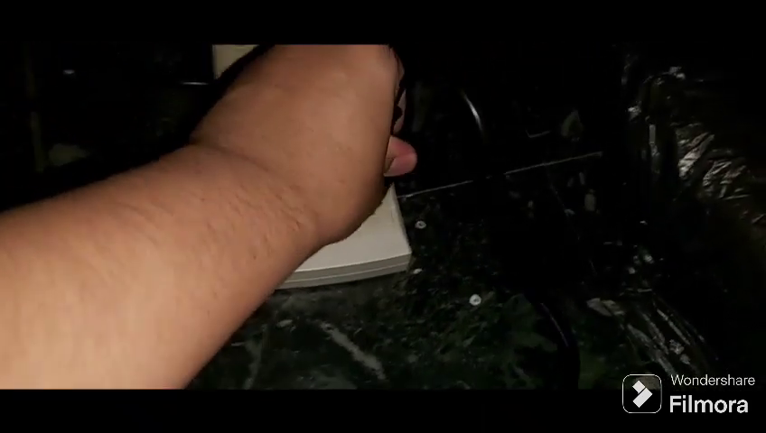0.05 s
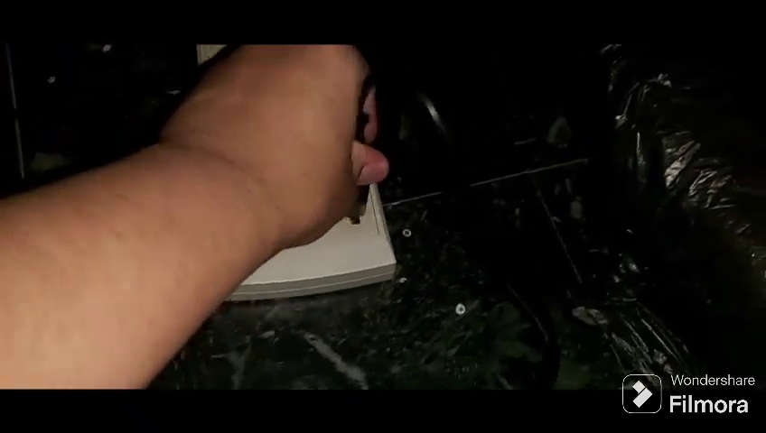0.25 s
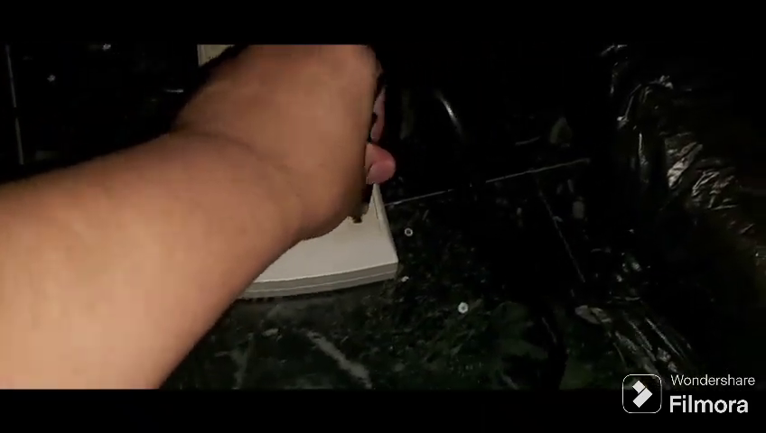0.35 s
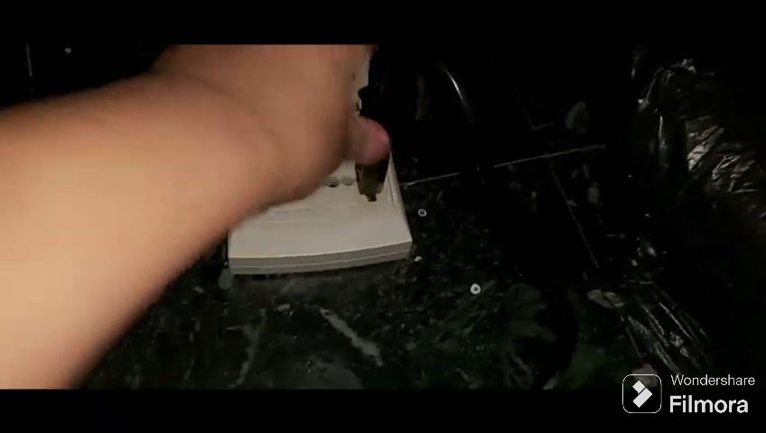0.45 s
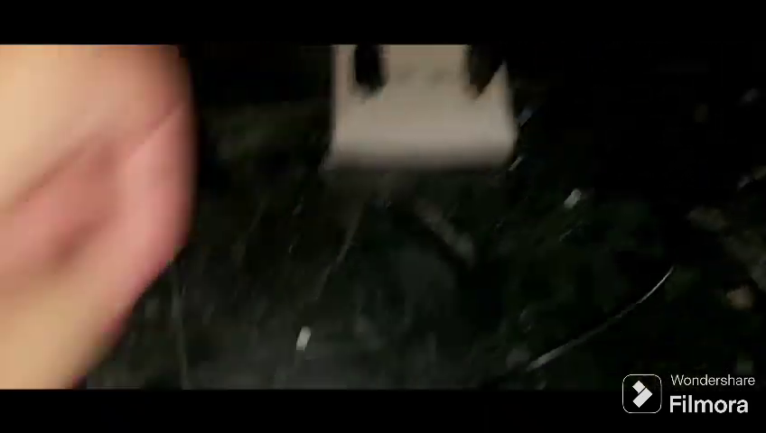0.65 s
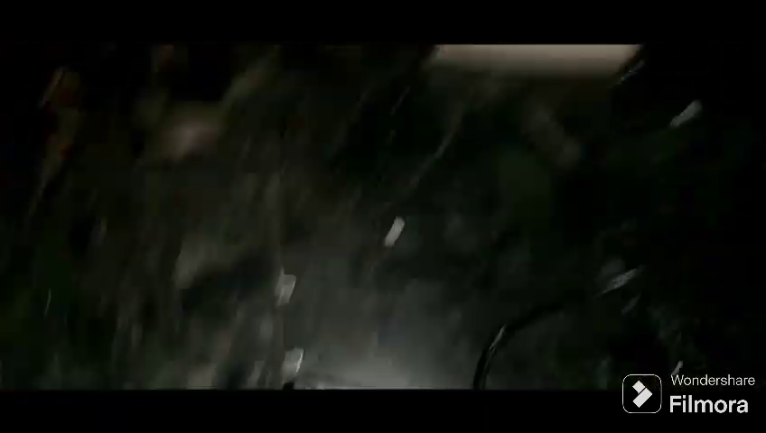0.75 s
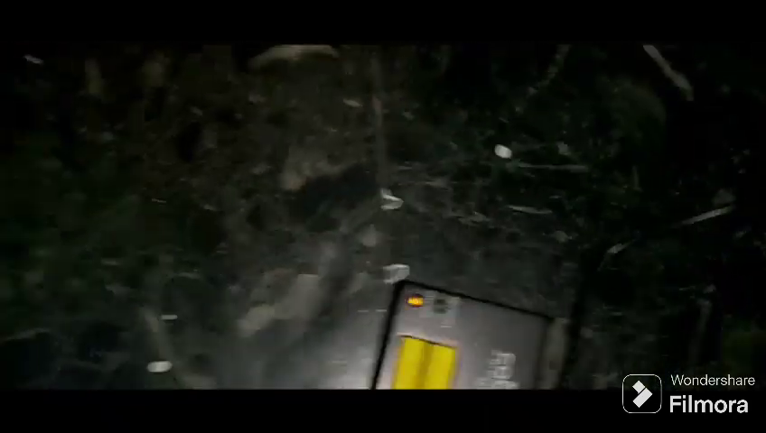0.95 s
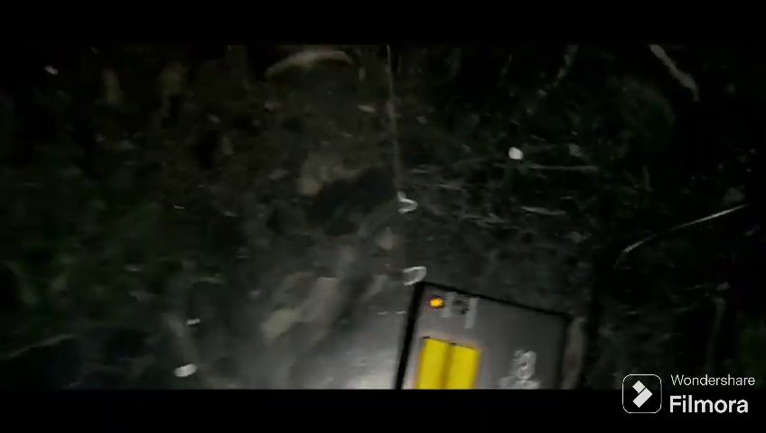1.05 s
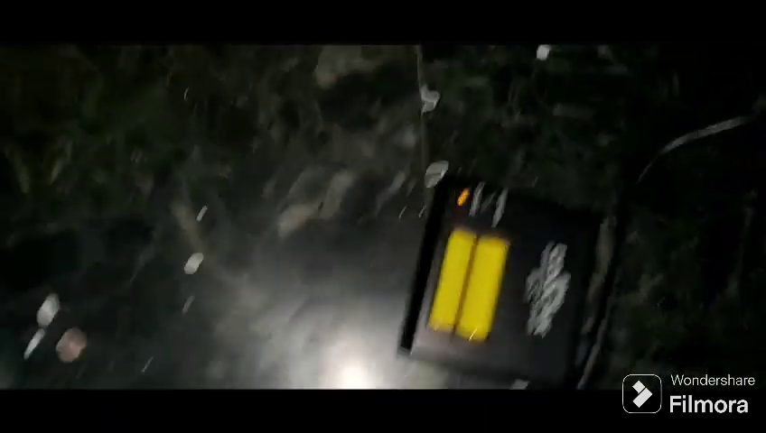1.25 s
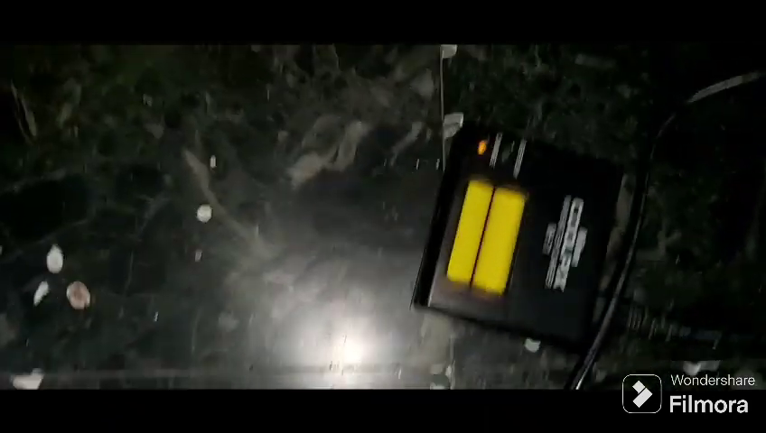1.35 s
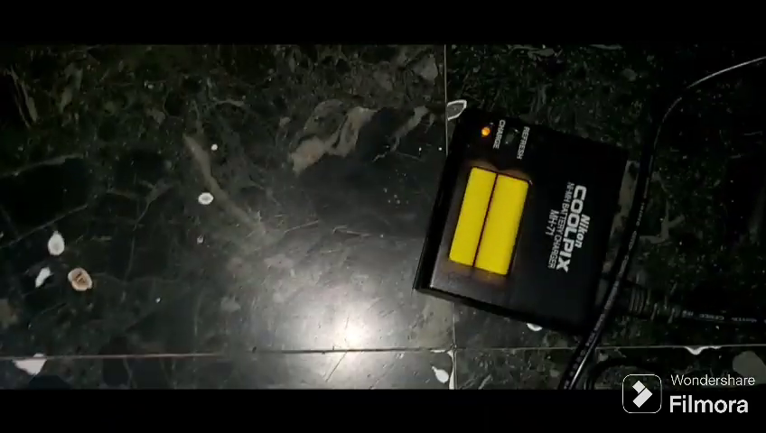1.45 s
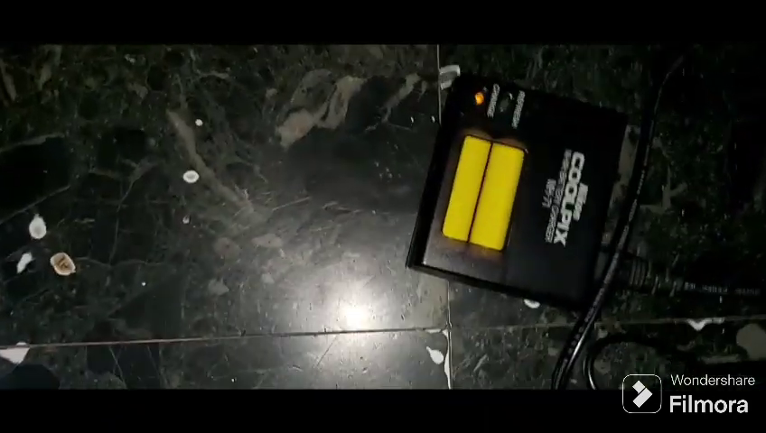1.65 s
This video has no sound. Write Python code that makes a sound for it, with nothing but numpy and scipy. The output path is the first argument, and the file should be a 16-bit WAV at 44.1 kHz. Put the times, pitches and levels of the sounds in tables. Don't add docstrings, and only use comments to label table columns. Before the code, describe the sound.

A plug is pushed into a plastic power strip with a scrape, quick hollow knocks and a sharp snap; then a lone click, faint ticks and a floor scuff, close handheld microphone in a quiet room.

```python
import sys
import numpy as np
from scipy import signal
from scipy.io import wavfile

SR = 44100
rng = np.random.default_rng(int(sys.argv[2]) if len(sys.argv) > 2 else 0)


def master(y):
    cut = np.clip(np.atleast_2d(y).T, -1, 1)
    pcm = np.round(cut * 32767)
    wavfile.write(sys.argv[1], SR, pcm.astype(np.int16))


def ratio_of_db(decibels):
    return 10 ** (np.asarray(decibels, float) / 20)


N = 74970
LAG_STRIP, LAG_HAND = 4, 2

# f/Hz, level/dB
CLOTH_SPECTRUM = [(880, -46.5), (1500, -16), (1850, -10), (3060, -15.5), (4330, -5.5), (8320, 0),
                  (16000, -7.5)]


def at_hz(points, hz):
    point_hz, point_db = np.transpose(points)
    return np.interp(np.log(hz), np.log(point_hz), point_db)


def level(rows):
    s, db = np.transpose(rows)
    return ratio_of_db(np.interp(np.arange(N) / SR, s, db))


def pan(db):
    return ratio_of_db(np.array([[db / 2], [-db / 2]]))


def later(x, count):
    return np.stack([x[0], np.roll(x[1], count)])


def highpass(x, hz):
    return signal.sosfilt(signal.butter(6, hz, "high", fs=SR, output="sos"), x)


def drift(rate_hz):
    slow = np.interp(np.arange(N) * rate_hz / SR, np.arange(400), rng.standard_normal(400))
    return slow / slow.std()


def ring(x, hz, t60):
    radius = ratio_of_db(-60 / (t60 * SR))
    w = 2 * np.pi * hz / SR
    return signal.lfilter([0, np.sin(w)], [1, -2 * radius * np.cos(w), radius * radius], x + 1e-18)


def dying(s, db, t60, attack_s=0.00036):
    t = np.maximum(np.arange(N) / SR - s, 0)
    return ratio_of_db(db - 60 * t / t60) * (1 - np.exp(-t / attack_s))


def noise(spectrum, alike, patchy_db, grain_db=0.):
    out = 0
    edges_hz = 25 * 2 ** np.arange(0, 9.6, .5)
    grain = np.minimum(rng.exponential(1, N), 5)
    white = rng.standard_normal((2, 2, N)) * ratio_of_db(grain_db * grain)
    for k, (low, high) in enumerate(zip(edges_hz, edges_hz[1:])):
        band = signal.butter(2, [low, high], "band", fs=SR, output="sos")
        mid, side = signal.sosfilt(band, white[k % 2])
        gain = ratio_of_db(at_hz(spectrum, np.sqrt(low * high)) + patchy_db * drift(25))
        out = out + gain * (np.sqrt(1 + alike) * mid + np.sqrt(1 - alike) * side * [[1], [-1]])
    return out / np.sqrt(np.mean(out ** 2))


def contact(s, db, length_s, jitter):
    out = np.zeros(N)
    for share, loss_db, j in zip((0, .5, 1), (-10, -1.5, -11), jitter):
        out[int((s + share * length_s) * SR)] += ratio_of_db(db + loss_db + 2.5 * j)
    return out


def strip():
    # t/s, peak level/dB, brightness/dB, contact length/s
    knocks = [(0.032, -55, -6.5, 0.0019), (0.044, -56.5, -12, 0.0015), (0.061, -53, -4, 0.0022),
              (.078, -45, -13, 0.0018), (.083, -44.5, -16, 0.0025), (0.097, -37, -10, 0.0025),
              (0.135, -32.5, -13, 0.0049), (0.17, -32, -7.5, 0.0022), (.213, -47, -9, 0.0022),
              (0.2269, -11, 0.5, 0.0023), (.260, -48, 8, 0.0041), (0.289, -58, -7, .004),
              (0.3677, -38.5, -20.5, .0022), (0.541, -50.5, -15.5, 0.0043), (0.564, -53, -12, 0.0027)]
    # f/Hz, level/dB, t60/s, left-right/dB
    modes = [(618, -14, .03, -9.5), (720.7, -17, 0.032, -2), (860, -12, 0.031, 5), (885, -6.5, 0.034, 4),
             (971, -29, 0.16, 3.5), (1126, -8.5, 0.018, 0), (1275, -18.5, 0.019, 7.5),
             (1750, -36.5, 0.023, -3.5), (2083, -21.5, 0.024, -5.5), (2716, -20.5, 0.028, -6.5),
             (3380, -17.5, 0.024, 8), (3910, -19, .022, 19), (4390, -25, 0.016, -0.5)]
    # t/s, level/dB
    drag = [
        (0, -46.5),
        (.03, -61),
        (.1, -45),
        (.2, -42),
        (.3, -59),
        (.4, -60),
        (.47, -87),
    ]
    slips_per_s, drag_db, drag_dull_db = 700, -14, -7
    grit_db, grit_lengths = -6, 1.8
    bright_hz, soft_hz, cut_hz = 1400, 1350, 600
    out = 0
    jitter = rng.standard_normal((len(knocks), len(modes), 3))
    slip_now = rng.random(N) < slips_per_s / SR
    slips = slip_now * rng.standard_normal(N) * level(drag) * ratio_of_db(drag_db)
    grit = sum(dying(s, db + bright_db + grit_db, grit_lengths * length_s)
               for s, db, bright_db, length_s in knocks)
    soft = signal.butter(2, soft_hz, fs=SR, output="sos")
    for k, (hz, db, t60, pan_db) in enumerate(modes):
        if hz > bright_hz:
            hits = grit * rng.standard_normal(N) + slips * ratio_of_db(drag_dull_db)
        else:
            blows = sum(contact(s, knock_db, length_s, j[k])
                        for (s, knock_db, _, length_s), j in zip(knocks, jitter))
            hits = signal.sosfilt(soft, slips * ratio_of_db(-.5 * db) + blows)
        out = out + pan(pan_db) * ratio_of_db(db) * ring(hits, hz, t60)
    return later(highpass(out, cut_hz), count=LAG_STRIP)


def bright_snaps():
    # t/s, peak level/dB, t60/s, left-right/dB
    snaps = [(0.077, -54, .03, 0.5), (0.0962, -23, .012, -7.5), (.099, -35.5, 0.045, 7.5),
             (0.113, -51.5, 0.17, -1), (0.1716, -39, 0.033, -3.5), (0.180, -52, .2, 0),
             (0.189, -53, .03, -0.5), (.211, -50, 0.03, 0), (.2272, -31, .035, -5.5),
             (.240, -54.5, .15, 0.5), (1.6357, -42, .03, 3), (1.6412, -36, .015, 2),
             (1.570, -61, .05, -1.5), (1.6618, -36.5, .01, -2)]
    # f/Hz, level/dB
    brass = [(1500, -40), (3400, -32), (4300, -4), (6000, -8.5), (7600, -5), (10000, -15), (13500, -0.5),
             (16000, -17)]
    bursts = sum(pan(pan_db) * dying(s, db - 4.5, t60, 0.00031) for s, db, t60, pan_db in snaps)
    return noise(brass, alike=.3, patchy_db=1.0, grain_db=2.0) * bursts


def clear_notes():
    # t/s, peak level/dB, f/Hz, t60/s, left-right/dB
    tones = [(.033, -64, 920, 0.02, 5), (.079, -51, 1026, 0.048, -2), (.096, -45.5, 1804, 0.046, -5),
             (.096, -45.5, 2070, .03, 3), (.137, -42.5, 1650, .045, 6), (.137, -45.5, 2090, .045, 5),
             (.137, -55, 2570, .03, 5), (.170, -52, 784.5, .04, -4), (.173, -48.5, 1707, .07, -1),
             (.188, -43.5, 914, 0.056, 0), (.227, -35, 1855, 0.026, -5), (.2272, -20.5, 3380, .02, -3),
             (.231, -33, 3780, .025, -3), (.229, -34, 4200, 0.028, 3), (.228, -43, 5230, .02, 4),
             (.229, -34.5, 2390, .04, -4), (.367, -50, 658, 0.09, -0.5), (.369, -49, 1090, 0.051, 0.5),
             (.371, -63, 1440, .08, 0), (.541, -59, 648, .1, 2), (.569, -60, 750, .05, 0),
             (.8116, -27, 2170, .022, -2), (.8116, -30, 2830, .02, -3), (.812, -42, 3310, .015, -2),
             (.814, -42, 1670, .025, 0), (.820, -49, 980, .03, 0)]
    out, t = 0, np.arange(N) / SR
    for s, db, hz, t60, pan_db in tones:
        out = out + pan(pan_db) * dying(s, db, t60, attack_s=.0015) * np.sin(2 * np.pi * hz * (t - s))
    return later(out, count=LAG_STRIP)


def squeals():
    # start t/s, length/s, level/dB, first f/Hz, last f/Hz
    glides = [
        (.100, .036, -50, 725, 715),
        (0.256, .02, -50, 880, 933),
        (0.281, 0.033, -50, 929, 968),
    ]
    out, t = 0, np.arange(N) / SR
    for s, length_s, db, first_hz, last_hz in glides:
        u = np.clip((t - s) / length_s, 0, 1)
        swell = np.sqrt(np.abs(np.sin(np.pi * u))) * (u < 1)
        cycles = length_s * u * (first_hz + (last_hz - first_hz) * u / 2)
        out = out + pan(3.0) * ratio_of_db(db) * swell * np.sin(2 * np.pi * cycles)
    return later(out, count=LAG_STRIP)


def tails():
    # t/s, level/dB, t60/s, attack/s
    scrapes = [
        (.09, -54.5, 0.59, 0.0085),
        (0.139, -40, 0.049, 0.0017),
        (.228, -41, 0.17, .003),
        (.255, -79, 0.1, .005),
        (.367, -66, 0.096, 0.0019),
        (0.535, -65, 0.21, 0.0078),
        (0.698, -65, 2.0, .06),
        (1.345, -67, 0.37, 0.021),
        (0, -58.5, 0.093, 0.0012),
        (0.809, -53.5, 0.22, 0.0029),
    ]
    # f/Hz, level/dB
    plastic = [(500, -3), (1200, -6.5), (2500, -8.5), (5000, -18.5), (9000, -29), (16000, -31.5)]
    return noise(plastic, alike=.3, patchy_db=5.0, grain_db=1.5) * sum(dying(*row) for row in scrapes)


def click():
    # f/Hz, level/dB, t60/s
    joint = [(980, -26, 0.028), (1600, -20, 0.03), (2120, -20, 0.017), (2420, -12, 0.015),
             (2770, -4.5, 0.016), (4890, -5, 0.0043)]
    click_s, length_s, pan_db = .8115, 0.0039, 0
    rattle = dying(click_s, -29.5 - 12.5, 3.64 * length_s, attack_s=0.00083)
    grit = rng.standard_normal((len(joint), N)) * rattle
    body = sum(ratio_of_db(db) * ring(g, hz, t60) for (hz, db, t60), g in zip(joint, grit))
    hiss = noise(CLOTH_SPECTRUM, alike=0.716, patchy_db=0.5) * dying(click_s, -37, .03, attack_s=0.002327)
    return later(pan(pan_db) * (highpass(body, 760) + hiss), count=LAG_HAND)


def ticks():
    # t/s, peak level/dB, f/Hz, left-right/dB
    taps = [(.047, -48.5, 5500, 0), (0.0973, -38, 7600, -7), (0.563, -62, 7270, 8),
            (0.7524, -48, 4330, 7.5), (0.7529, -56.5, 5900, 23), (.942, -57, 1107, 3.5),
            (.942, -60, 1898, 5), (1.194, -58.5, 1700, -2.5), (1.195, -57.5, 4386, -3),
            (1.325, -68, 799, -4), (1.590, -62, 8500, 0), (1.325, -64, 4500, -8), (1.269, -57, 13000, -11),
            (.942, -51, 6310, 7.5), (1.020, -55, 7300, -2.5), (1.062, -64.5, 1808, 5.5),
            (1.109, -63, 1503, -6), (1.193, -58.5, 3400, -3), (1.193, -53, 6600, -11),
            (1.269, -53, 7000, -11), (1.269, -56, 8200, -10.5), (1.323, -58, 8070, -20),
            (1.641, -44, 3800, -3), (1.636, -46, 5500, 0), (1.675, -47, 2600, 4), (1.691, -47, 2650, 4),
            (1.6404, -42.5, 2704, 12.5), (1.6616, -37.5, 3530, 2), (1.662, -48, 1255, 10.5)]
    t60_cycles, t = 12.0, np.arange(N) / SR
    out, grit = 0, rng.standard_normal((2, N))
    grit = 0.74 * grit[0] + 0.3 * grit
    for s, db, hz, pan_db in taps:
        tap = grit * dying(s, db - 10.5, .004, 0.00033)
        tone = dying(s, db + 2.0, 2.23 * t60_cycles / hz) * np.sin(2 * np.pi * hz * t)
        out = out + pan(pan_db) * (0.47 * ring(tap, hz, t60_cycles / hz) + 0.5 * tap + tone)
    return later(out, count=LAG_HAND)


def bumps():
    # t/s, peak level/dB, f/Hz
    thuds = [(.14, -55, 70.76), (.245, -49, 110), (0.48, -63, 132.2), (.8155, -45, 278),
             (.9425, -48.5, 360), (1.110, -56.5, 223), (1.5, -59.5, 89), (1.2, -58, 102),
             (0.18, -55.5, 180), (.105, -54, 200)]
    t60_cycles, out = 3.5, 0
    for s, db, hz in thuds:
        push = contact(s, db - 2.5, 0.19 / hz, (0, 0, 0))
        flesh = ring(push, hz, 1 / hz) * 30.0 * hz / SR
        out = out + ring(flesh, hz, t60_cycles / hz) * pan(-2.495)
    return later(out, count=LAG_HAND)


def cloth():
    # t/s, level/dB
    rustle = [(0, -67.5), (.06, -83), (.3, -74.5), (.45, -89), (.65, -90), (.78, -74.5), (.85, -69.5),
              (1.02, -73), (1.08, -79.5), (1.2, -76), (1.3, -83), (1.35, -72), (1.385, -59.5), (1.42, -68),
              (1.46, -83), (1.57, -80), (1.62, -62), (1.7, -72.5)]
    return level(rustle) * pan(-2.2) * noise(CLOTH_SPECTRUM, alike=.3, patchy_db=1.3)


def foot():
    # t/s, level/dB
    scuff = [
        (0, -120),
        (1.55, -81),
        (1.615, -71),
        (1.635, -47.5),
        (1.645, -46.5),
        (1.655, -49),
        (1.7, -45.5),
    ]
    # f/Hz, level/dB
    sole = [(180, -41), (300, -5), (689, -20.5), (1210, -9), (1970, -6), (2570, -4.5), (3460, -5),
            (7200, -7.5), (16000, -20)]
    grind = noise(sole, alike=.6, patchy_db=1.5, grain_db=2.5)
    return later(level(scuff) * pan(2.4) * grind, count=LAG_HAND)


def echoes(x):
    echo_db, echo_t60_s = -15, 0.12
    t = np.arange(SR // 3) / SR
    reply = rng.standard_normal((2, len(t))) * ratio_of_db(-60 * t / echo_t60_s) * (t > .003)
    reply = signal.lfilter([.4], [1, -.6], reply)
    reply = reply / np.sqrt(np.sum(reply[0] ** 2))
    return ratio_of_db(echo_db) * signal.fftconvolve(x, reply, axes=1)[:, :N]


def room():
    # t/s, level/dB
    rumble = [(0, -71), (.14, -52.5), (.3, -67), (.55, -77.5), (.68, -59.5), (.95, -63.5), (1.1, -70),
              (1.55, -75.5), (1.66, -61)]
    # f/Hz, level/dB
    air = [(15, -39), (25, -9), (117, 2.5), (394, -9), (531, -10.5), (796, -16.5), (3430, -36),
           (14800, -46.5), (16000, -42)]
    hum_start_s, hum_db = 0.89, -75.5
    hum = ring(rng.standard_normal(N), 530, 0.73)
    drone = ring(rng.standard_normal(N), 72, 0.08)
    hum_gain = level([(hum_start_s - .05, -100), (hum_start_s, hum_db), (1.7, hum_db - 9.0)])
    hum = hum / hum.std() * hum_gain
    drone = level(rumble) * ratio_of_db(-5) * highpass(drone / drone.std(), 45)
    steady = ratio_of_db(-68.5) * noise(air, alike=0.61, patchy_db=3.0)
    return pan(-3.7) * (steady + drone) + hum


def scene():
    case = strip()
    near = bright_snaps() + clear_notes() + squeals() + tails() + click() + ticks() + bumps()
    return case + near + echoes(near + ratio_of_db(-6) * case) + cloth() + foot() + room()


def band_limit(x):
    return signal.sosfilt(signal.butter(12, 16360, fs=SR, output="sos"), x)


def record(dry):
    top_cut = signal.cheby2(10, 22, 16000, fs=SR, output="sos")
    mix = signal.sosfilt(top_cut, highpass(dry, 34))
    return band_limit(mix)


dry = scene()
out = record(dry)
master(out)
```